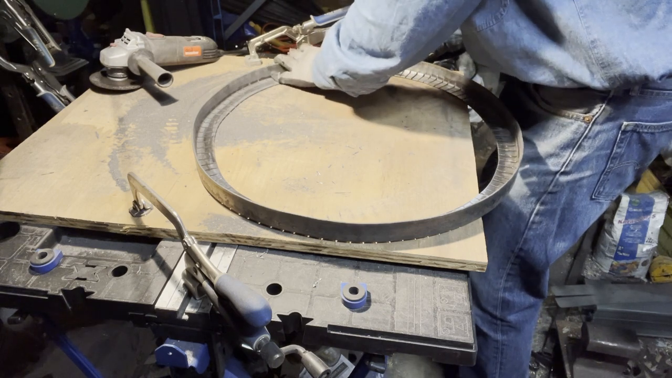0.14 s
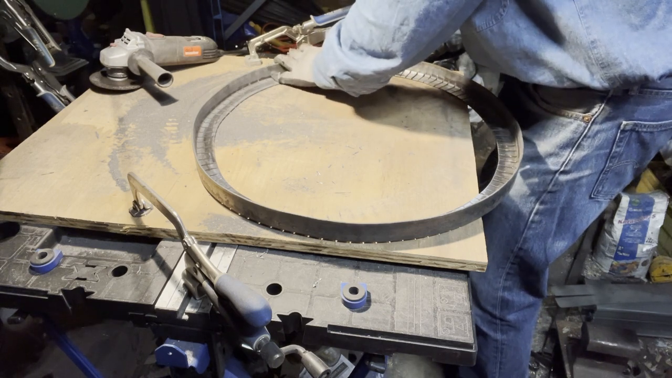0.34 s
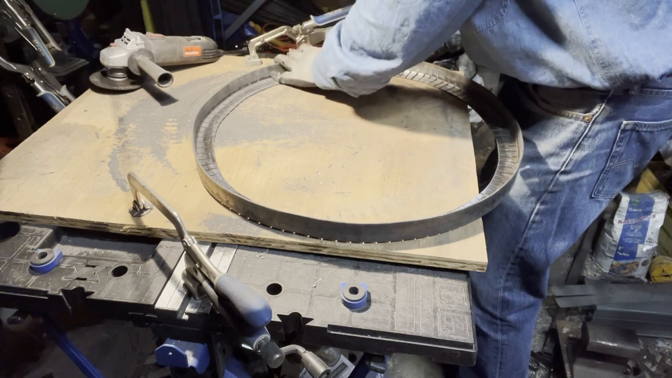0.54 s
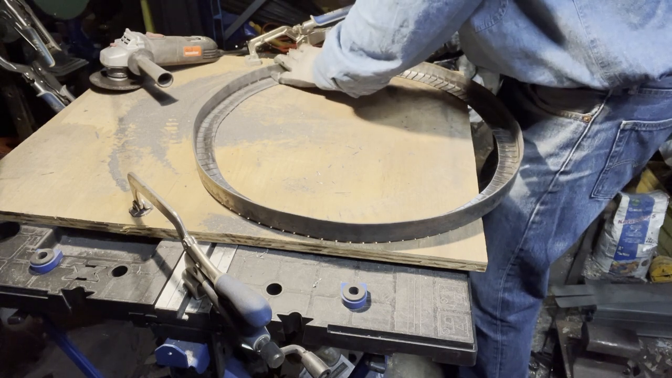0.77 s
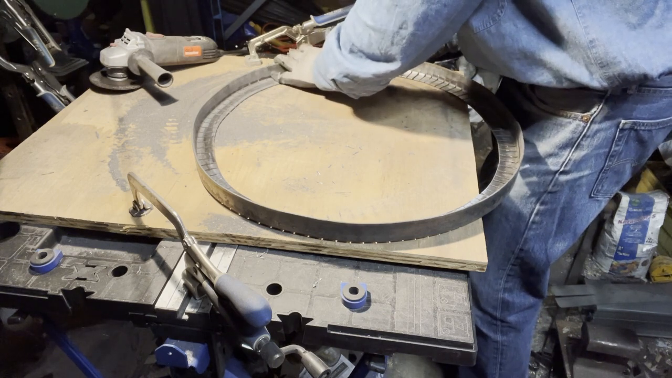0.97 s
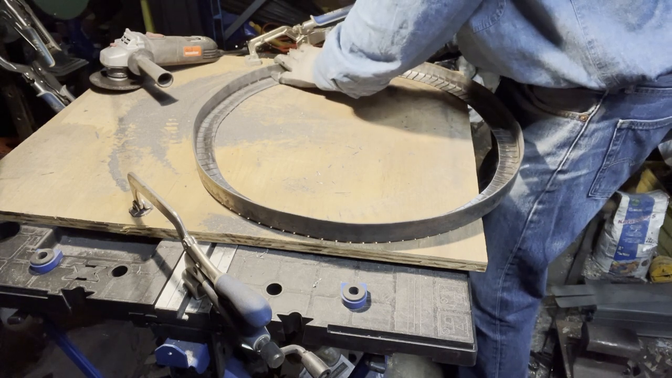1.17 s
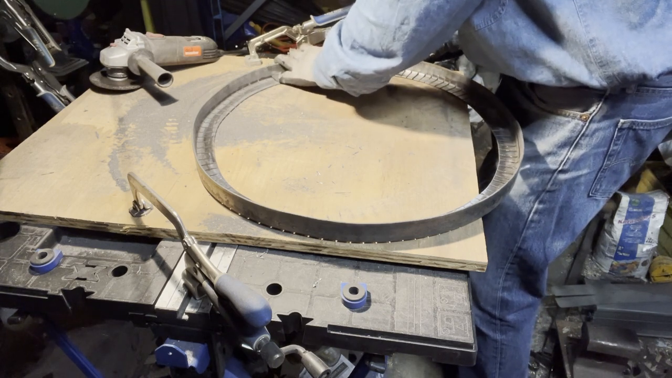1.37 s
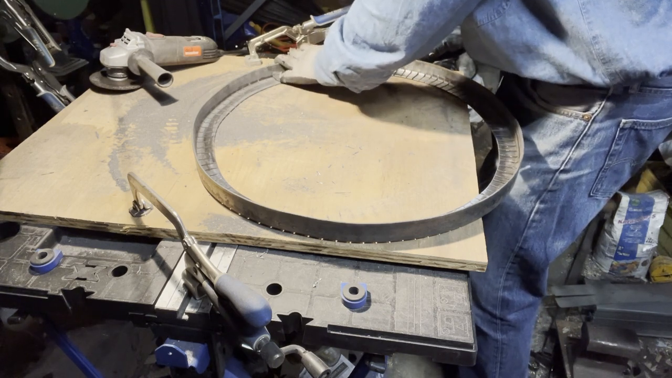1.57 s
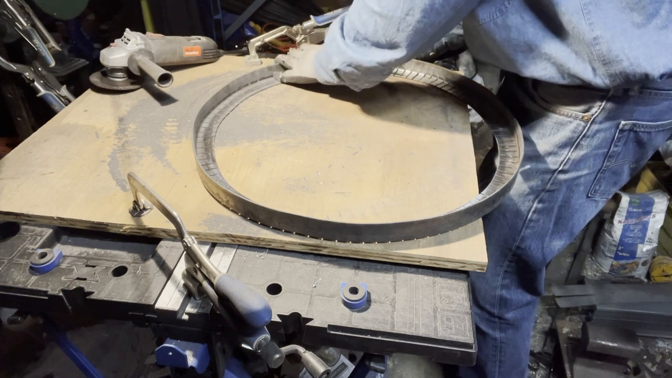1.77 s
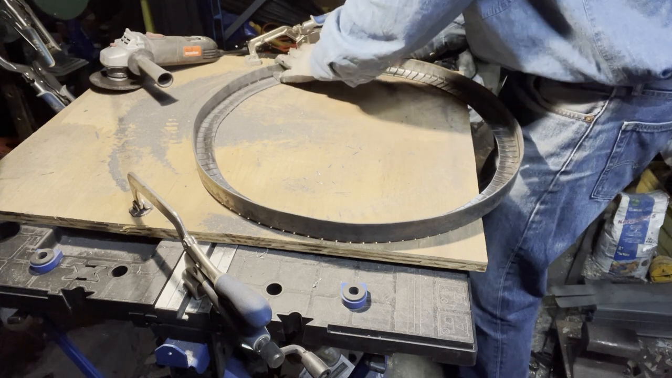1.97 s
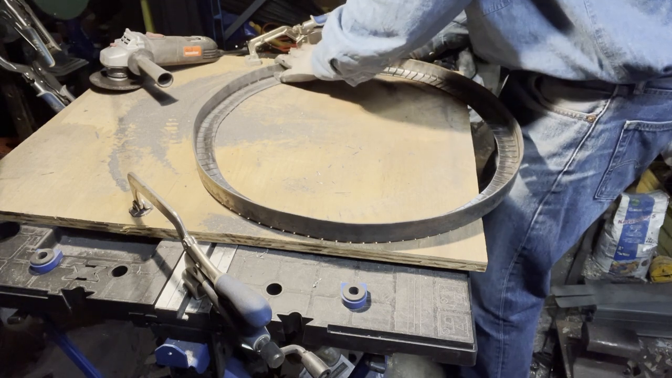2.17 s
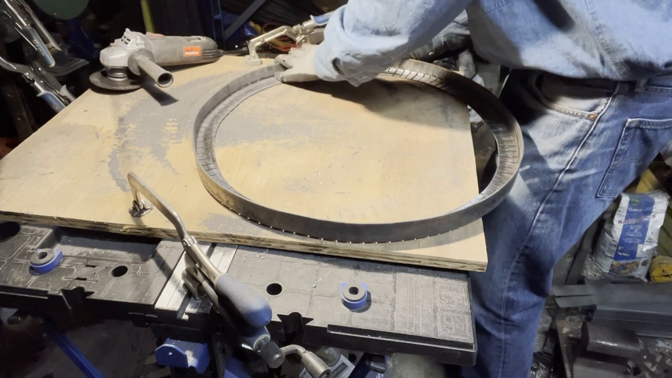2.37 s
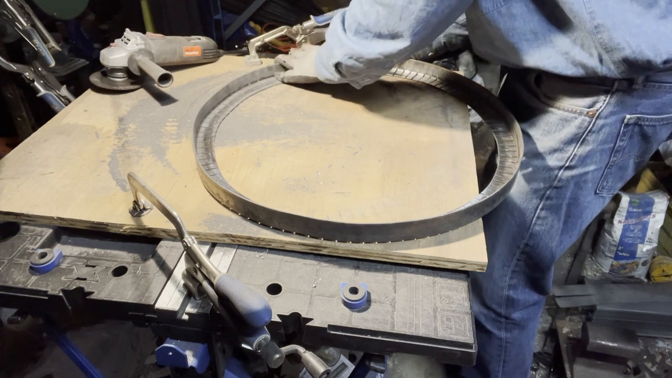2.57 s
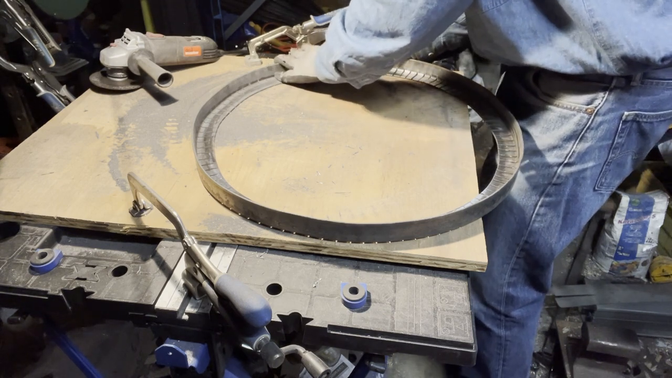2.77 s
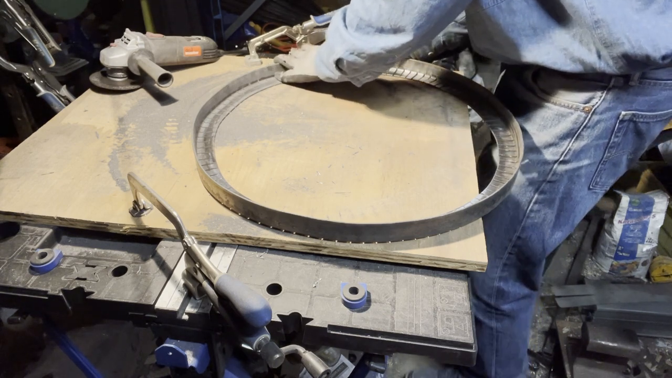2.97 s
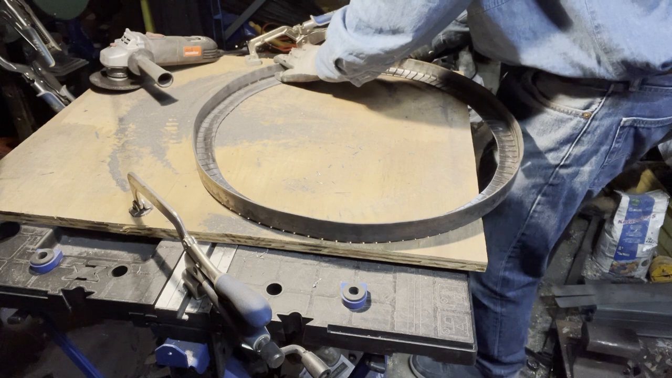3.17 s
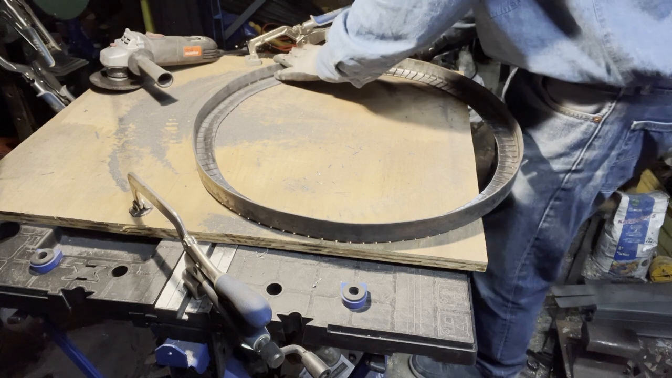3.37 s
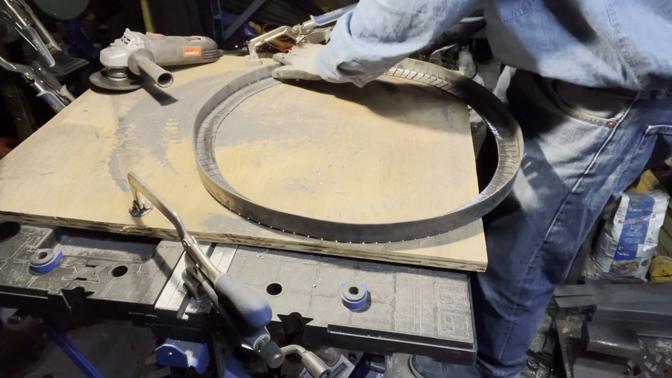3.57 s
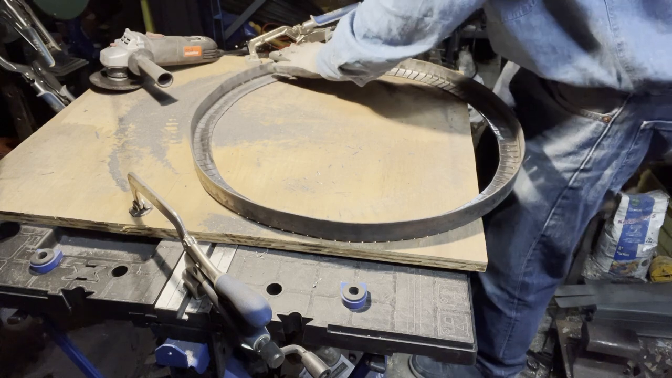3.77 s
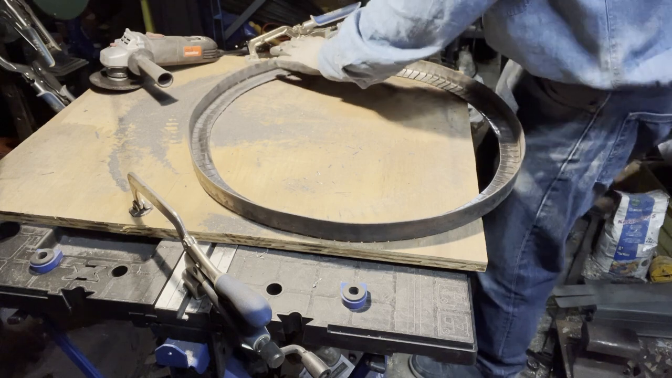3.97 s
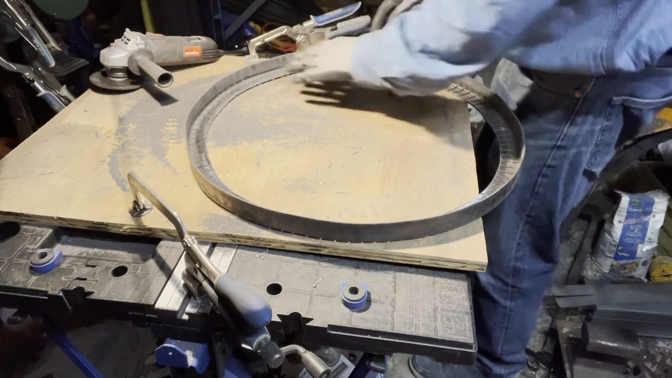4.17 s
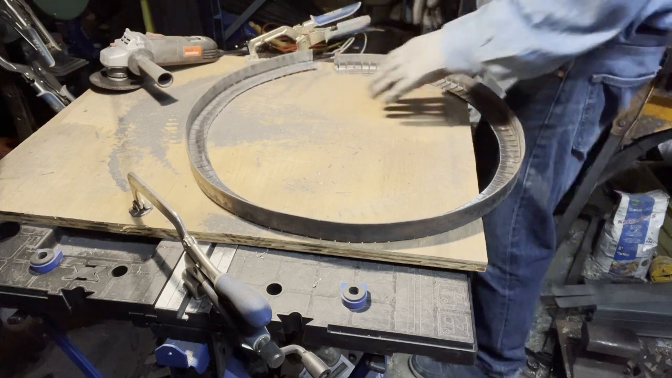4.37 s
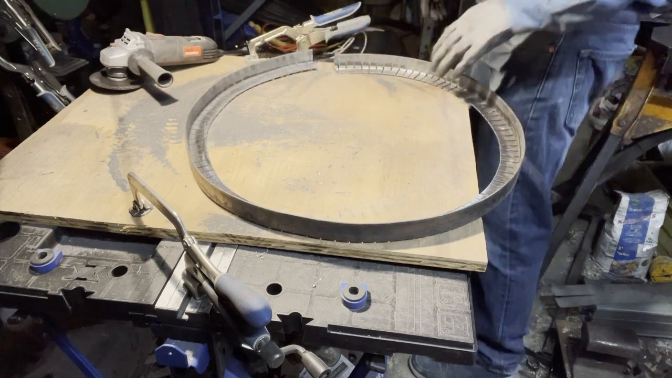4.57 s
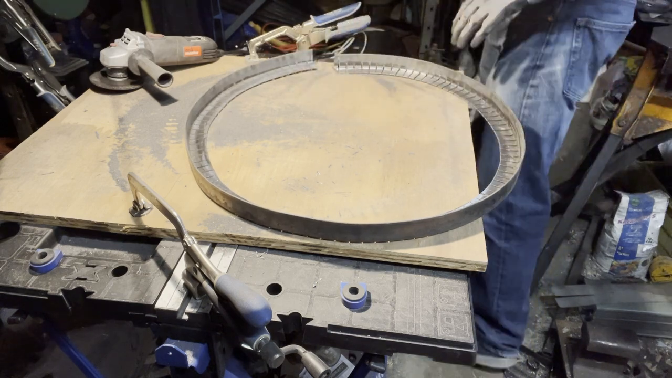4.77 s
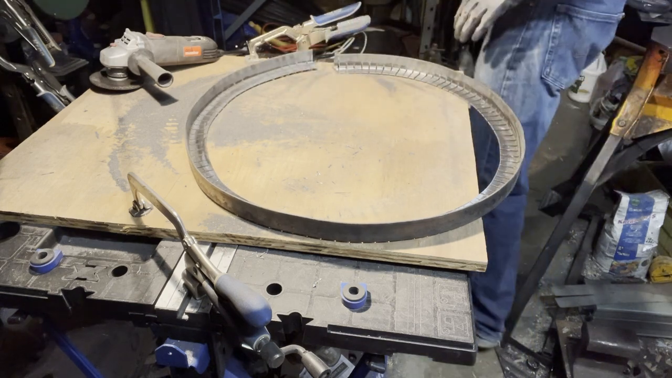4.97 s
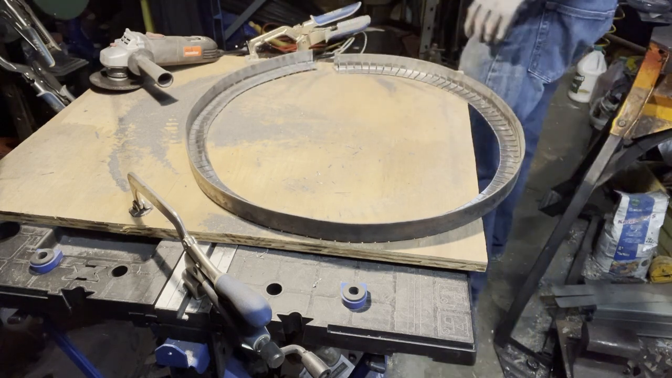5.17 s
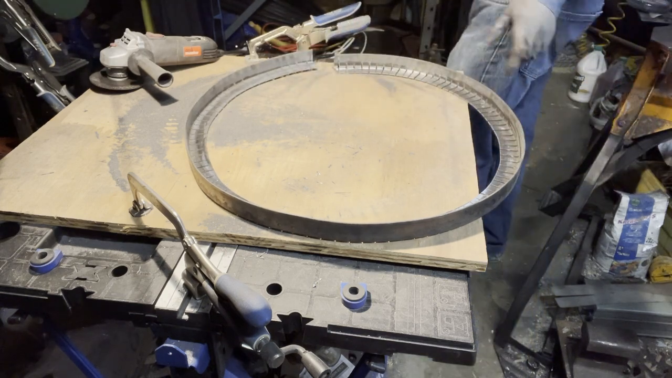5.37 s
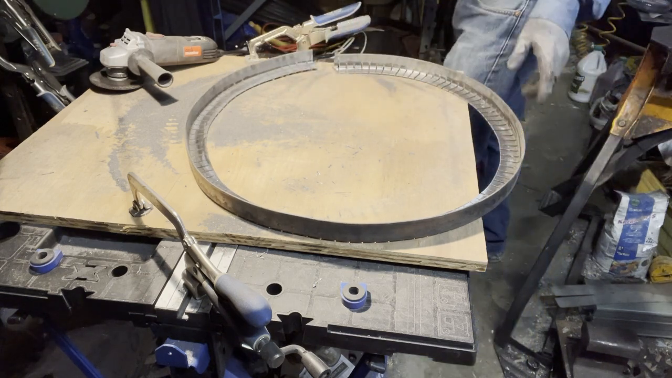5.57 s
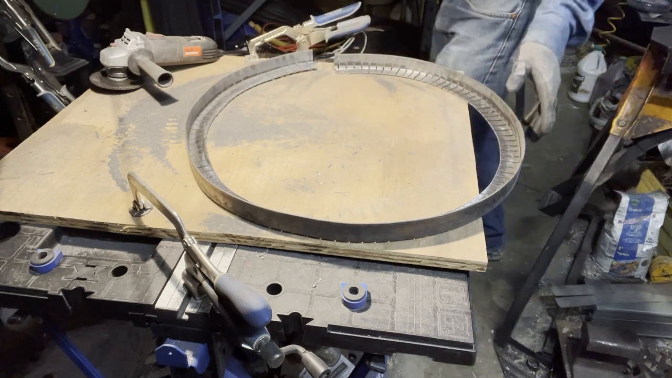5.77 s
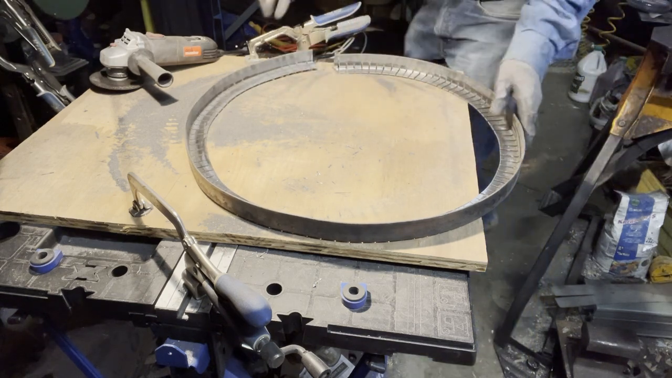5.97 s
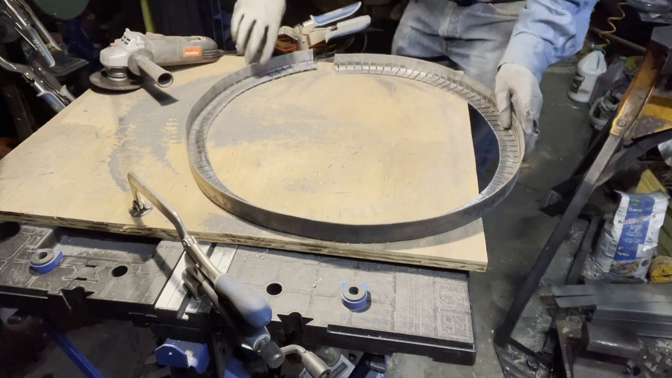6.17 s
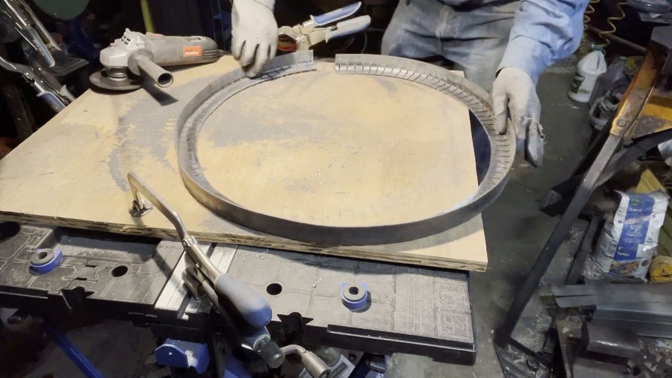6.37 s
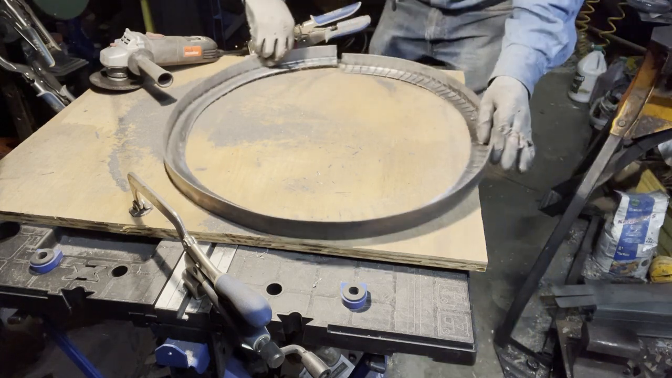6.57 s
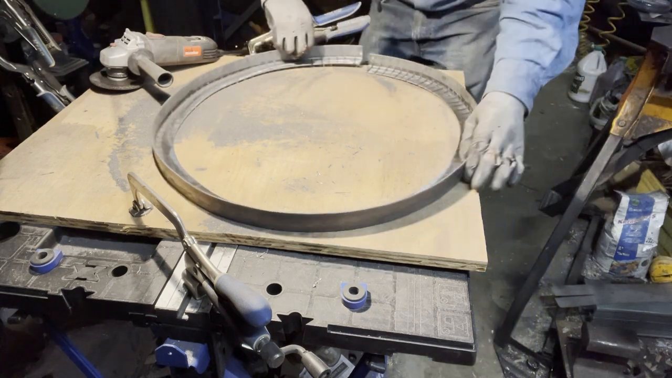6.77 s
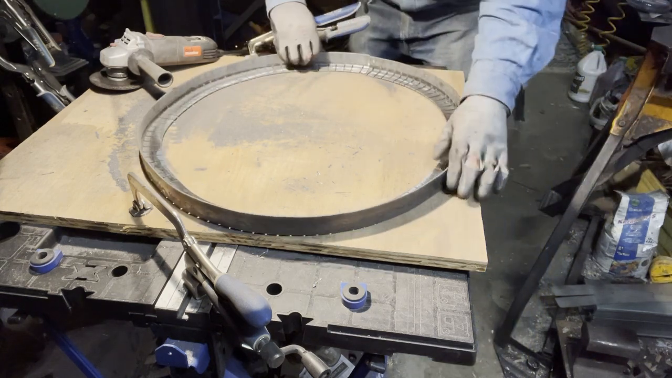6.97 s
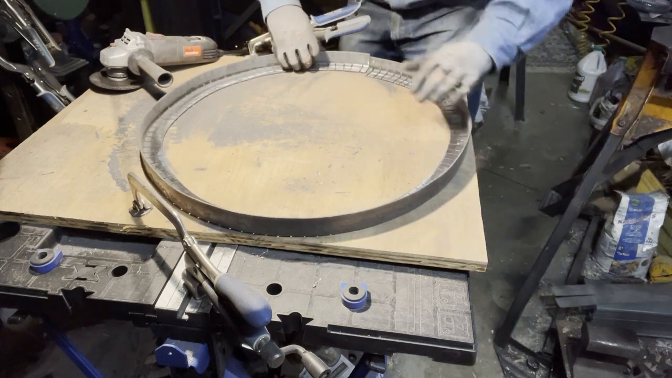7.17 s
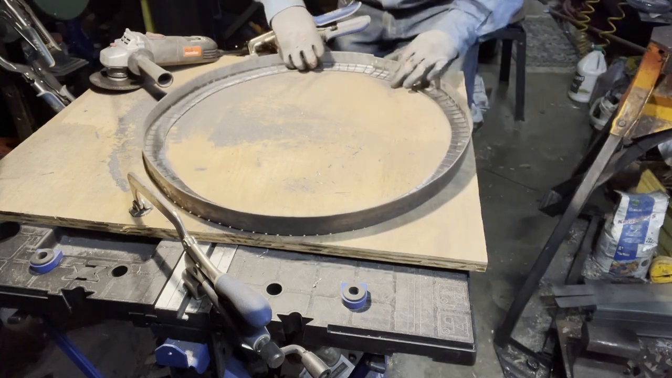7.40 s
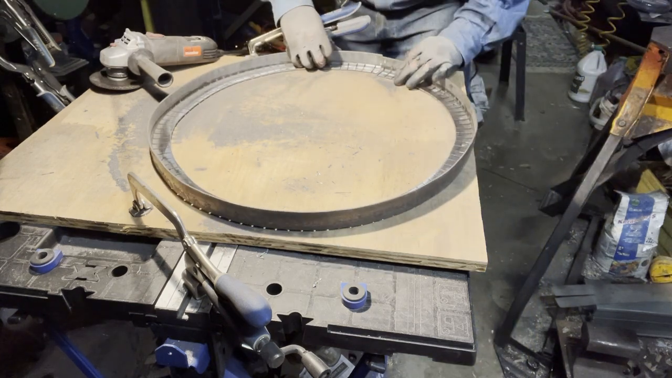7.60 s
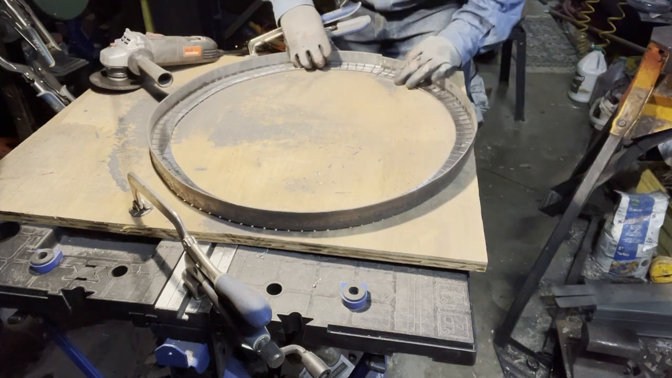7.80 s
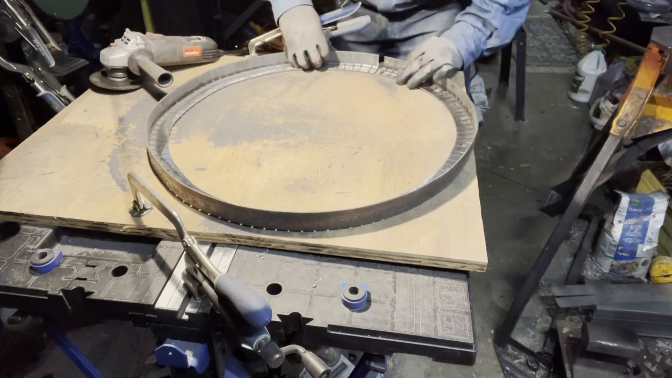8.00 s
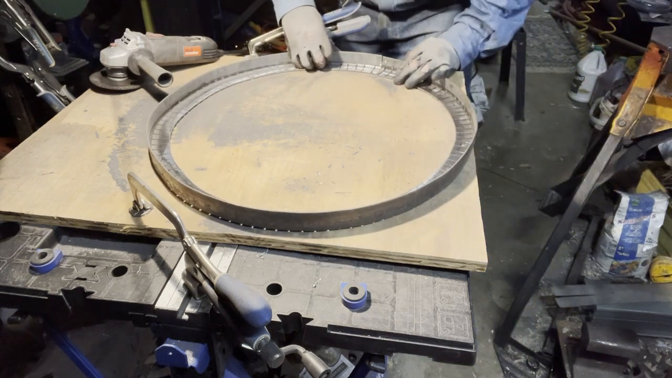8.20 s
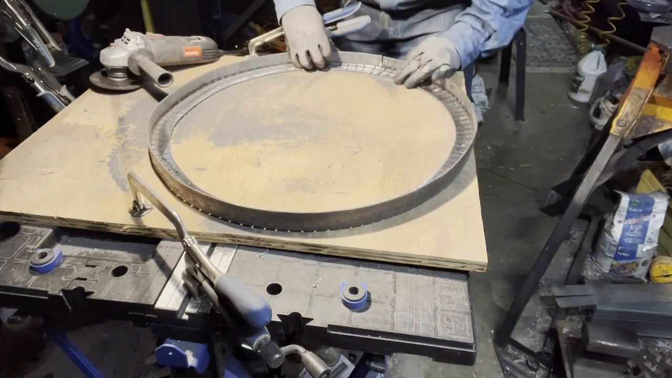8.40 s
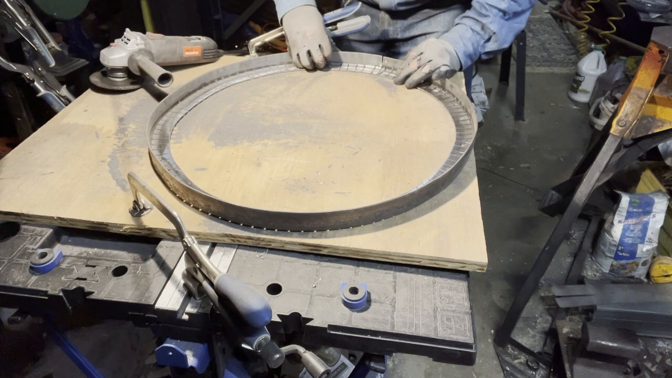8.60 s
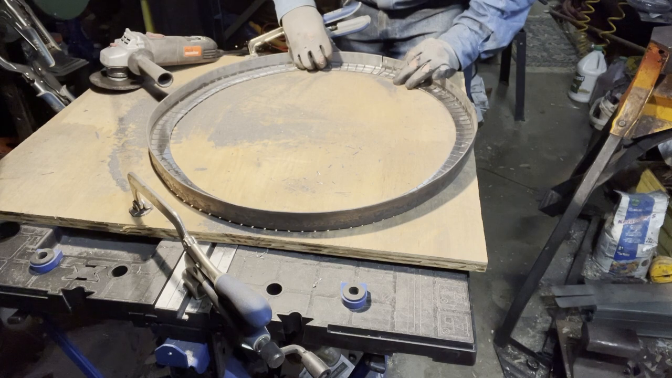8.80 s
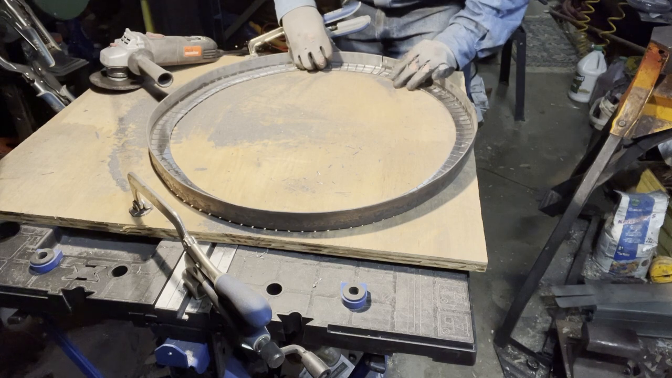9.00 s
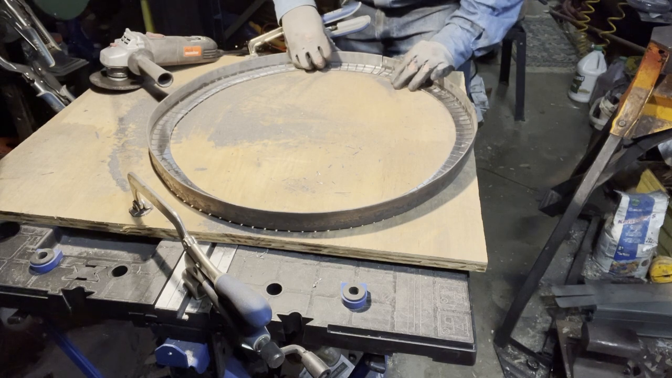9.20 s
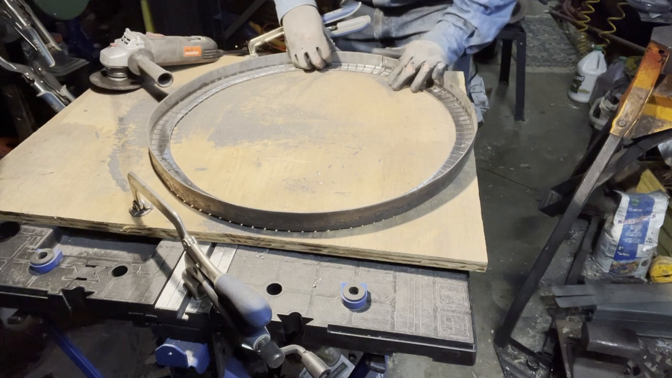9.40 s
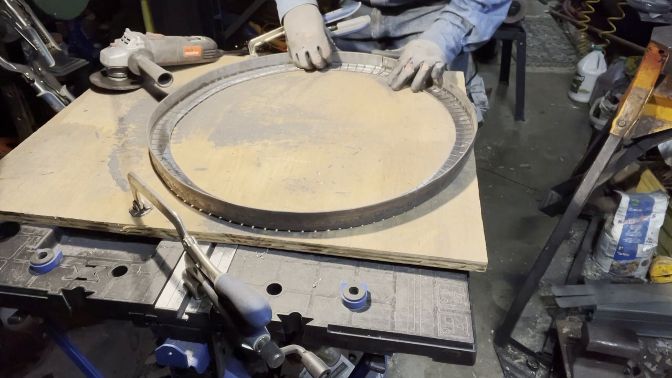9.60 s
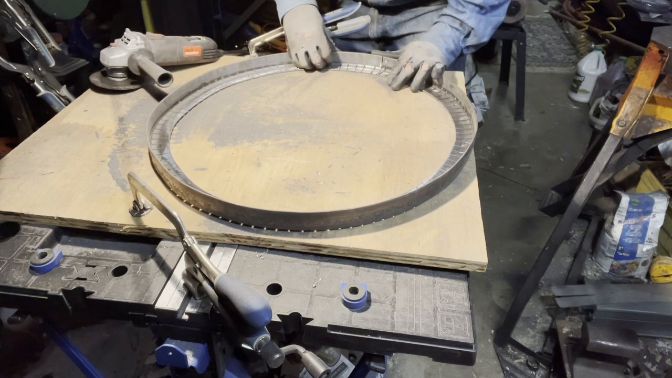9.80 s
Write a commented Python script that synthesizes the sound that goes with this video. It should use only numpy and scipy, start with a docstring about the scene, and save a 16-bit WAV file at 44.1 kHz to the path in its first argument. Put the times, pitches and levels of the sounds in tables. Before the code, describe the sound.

Gloved hands faintly brush a steel band, then drag it raspingly over a drumming plywood bench top, with clattering shoves and fading ticks over low hum.

```python
"""Steel band pushed over a workshop bench

A bent steel band goes across a plywood bench top in a workshop, in one long drag and a few short shoves, in stereo.
Its edge catches and slips on the grain: random slips drive decaying modes and noise, so the board drums,
the band rasps while gripped, rings and briefly squeals, and grit hisses.
Between shoves gloves and work clothes brush in bursts of noise, and the band ticks on the wood over a low machine hum."""
import sys
import numpy as np
from scipy import signal
from scipy.fft import rfft, irfft
from scipy.io import wavfile

SR = 44100
rng = np.random.default_rng(int(sys.argv[2]) if len(sys.argv) > 2 else 0)


def transcribe(signal):
    """Save signal, clipped to [-1, 1], as a 16-bit WAV file at the path in sys.argv[1]."""
    frames = np.atleast_2d(signal).T
    limited = np.clip(frames, -1, 1)
    pcm = np.round(limited * 32767).astype(np.int16)
    wavfile.write(sys.argv[1], SR, pcm)


N = 434385
T = np.arange(N) / SR
RING_T = T[:SR // 2]
EARS = np.array([[1], [-1]])  # left, right


def undb(db):
    """Decibels to gain."""
    return 10 ** (np.asarray(db) / 20)


def unit(x):
    """Scale to an rms of one."""
    return x / np.sqrt(np.mean(x ** 2))


def unit_energy(h):
    """Scale a stereo response so that its middle passes white noise at unchanged level."""
    return h / np.sqrt(np.sum(h.mean(axis=0) ** 2))


def at_hz(hz, table, axis=1):
    """Read one column of a table on a log-frequency axis."""
    table = np.array(table)
    return np.interp(np.log(np.maximum(hz, 1)), np.log(table[:, 0]), table[:, axis])


def lowpass(x, hz):
    """Fourth-order roll-off of the treble."""
    return signal.sosfilt(signal.butter(4, hz, fs=SR, output="sos"), x)


def highpass(x, hz):
    """Third-order roll-off of the bass."""
    return signal.sosfilt(signal.butter(3, hz, "high", fs=SR, output="sos"), x)


def split(x, hz):
    """Part a signal into lows and highs; filtering both ways keeps them in time."""
    low = lowpass(lowpass(x, hz)[..., ::-1], hz)[..., ::-1]
    return low, x - low


def walk(rate, count=N):
    """Smooth chance with an rms of one, turning at most rate times a second."""
    points = rng.standard_normal(N // 20)
    return unit(np.interp(T[:count] * rate, np.arange(N // 20), points))


# stereo image at the microphone: (pitch_hz, side_minus_mid_db, left_minus_right_db)
IMAGE = [(60, -9.5, 2.5), (200, -16.5, 5), (400, -2, -1), (750, -3, -0.5), (2300, -5, 0.5), (4600, 1, 0.5),
         (9000, -7.5, -1), (17000, 11.5, 1)]


def stereo_noise(colour, count, lag_s=.0001):
    """Coloured noise whose side share and left-right balance vary with pitch; its middle has a spread of one."""
    hz = np.arange(count // 2 + 1) * SR / count
    mid, side = rfft(rng.standard_normal((2, count)))
    pair = mid + EARS * side * undb(at_hz(hz, IMAGE))
    pair = pair * undb(EARS * at_hz(hz, IMAGE, axis=2) / 2)
    # the sound reaches the right port slightly sooner
    pair = pair * np.exp(-1j * np.pi * EARS * hz * lag_s)
    x = irfft(pair * undb(at_hz(hz, colour)), count)
    return x / x.mean(axis=0).std()


def fade(t60):
    """Exponential decay by 60 dB in t60 seconds."""
    return np.exp(-np.log(1000) * RING_T / t60)


def modes(table):
    """Decaying sines; each reaches the two ears with its own phase."""
    h = 0
    for k, (hz, db, t60) in enumerate(table):
        spread = (-1) ** k * np.arctan(undb(at_hz(hz, IMAGE)))
        gain = undb(db + EARS * at_hz(hz, IMAGE, axis=2) / 2)
        phase = 2 * np.pi * (hz * RING_T + rng.random()) + EARS * spread
        h = h + gain * fade(t60) * np.sin(phase)
    return unit_energy(h)


def wash(colour, t60, direct_db, room_db, direct_t60=0.012, room_t60=0.41):
    """A direct crack, the crowd of weaker modes behind it, and the short tail of the room."""
    envelope = undb(direct_db) * fade(direct_t60) + fade(t60) + undb(room_db) * fade(room_t60)
    return unit_energy(stereo_noise(colour, len(RING_T)) * envelope)


def sound(force, response):
    """Drive a body with a force."""
    return signal.oaconvolve(force[None], response, axes=1)[:, :N]


def sliding(force, responses, rate):
    """The contact point wanders along the edge, so the same modes answer with changing strength."""
    place, count = walk(rate), len(responses)
    out = 0
    for k, response in enumerate(responses):
        out = out + sound(force * np.cos(place + np.pi * k / count), response)
    return out * np.sqrt(2 / count)


def slips(rate, spread_db):
    """Friction: tiny slips at random moments and of random strength and sign, rate per second."""
    chance, size, sign = rng.random(N), rng.standard_normal(N), rng.choice([-1, 1], N)
    return unit((chance < rate / SR) * sign * undb(spread_db * np.clip(size, -2, 2)))


def snags(rate, release_s):
    """Gain of random catches that let go at once and die away."""
    keep = np.exp(-1 / (SR * release_s))
    power = slips(rate, spread_db=3.0) ** 2 + 1e-18
    return np.sqrt(signal.lfilter([1 - keep], [1, -keep], power))


def swell(t, rise, hold, release, curve=0.71):
    """A movement gathers speed as a power of time, keeps it and dies away."""
    return np.clip(t / rise, 0, 1) ** curve * np.exp(-np.maximum(t - rise - hold, 0) / release)


def strokes(table, axis):
    """Gain of a series of cloth strokes, from one dB column; the fabric rustles on faintly as it settles."""
    gain = np.zeros(N)
    for row in table:
        start, rise = int(row[0] * SR), 0.5 * row[1]
        hold = row[1] - rise
        stroke = swell(RING_T, rise, hold, release=0.02)
        settling = undb(-12.5) * swell(RING_T, rise, hold, release=0.04)
        shape = np.maximum(stroke, settling)
        gain[start:start + len(shape)] += undb(row[axis]) * shape[:N - start]
    return gain


# colour of the room's rumble: (pitch_hz, level_db)
SHOP = [(12, -39.5), (20, -32), (48, 0.5), (68, 0), (91, -6), (123, -3), (150, -16.5), (204, -21.5),
        (285, -24.5), (328, -29), (780, -45.5), (1090, -44.5), (5530, -53.5), (9140, -52), (16000, -72)]
# machine hum, mean levels before panning: (pitch_hz, level_db)
HUM = [(59.2, -69.5), (118.8, -57), (178, -77)]


def workshop(shop_db=-54.5, pan_db=3.0):
    """A machine hum of sines wavering in level and phase, over the noise rumble of the room."""
    hum = 0
    for hz, db in HUM:
        level = np.sqrt(2) * undb(db + 0.97 * walk(rate=13.0))
        hum = hum + level * np.sin(2 * np.pi * hz * T + 0.3 * walk(rate=4.8))
    return hum * undb(EARS * pan_db / 2) + undb(shop_db) * stereo_noise(SHOP, N)


# Stroke levels here are before each layer's own gain.
# gloves brushing the band: (start_s, length_s, scuff_level_db, hiss_level_db)
BRUSHES = [(.24, 0.12, -74, -102), (.365, 0.0051, -61.5, -68), (.63, 0.041, -58, -74),
           (.745, 0.13, -68, -98), (.865, 0.055, -51, -64.5), (.95, 0.087, -94, -103),
           (1.02, 0.074, -74, -91), (1.255, 0.055, -70.5, -95), (1.46, 0.11, -70, -95),
           (1.58, 0.075, -63.5, -77), (1.895, 0.026, -66, -84), (2.12, 0.074, -67, -81),
           (2.172, 0.071, -48, -63.5), (2.312, 0.006, -57, -61), (2.34, 0.07, -80, -70),
           (2.44, 0.12, -66.5, -78), (2.556, 0.031, -55, -54), (2.63, 0.11, -72, -81),
           (2.9, 0.082, -73, -53.5), (2.97, 0.044, -48.5, -52.5), (3.108, 0.082, -51, -51),
           (3.22, 0.16, -73, -69.5), (3.375, 0.14, -59, -65), (3.57, 0.24, -59.5, -75),
           (8.372, 0.026, -50, -64.5), (8.43, 0.064, -51.5, -74), (8.53, 0.21, -61.5, -74),
           (8.68, 0.2, -74, -71.5), (8.9, 0.15, -55.5, -61.5), (9.04, 0.12, -64, -61.5),
           (9.17, 0.16, -63, -66.5), (9.35, .15, -55.5, -61), (9.53, .2, -63, -70),
           (9.742, 0.073, -63, -77)]
# work clothes rubbing during a few steps round the bench: (start_s, length_s, swish_level_db, hiss_level_db)
DENIM = [(4.16, 0.056, -58.5, -76), (4.24, 0.37, -67.5, -73), (4.46, 0.05, -58, -68), (4.5, 0.16, -72, -75),
         (4.59, 0.079, -60, -61), (4.65, 0.13, -60.5, -66.5), (4.688, 0.0073, -79, -50.5),
         (4.77, 0.21, -70.5, -77.5), (4.97, 0.15, -79, -92), (5.195, 0.0091, -96, -78),
         (5.3, 0.016, -98, -77.5), (5.54, 0.018, -89, -76.5), (5.615, 0.073, -57.5, -61.5),
         (5.69, 0.15, -76, -77.5), (5.775, 0.071, -63.5, -70), (5.865, 0.081, -58.5, -56),
         (5.93, 0.12, -54.5, -59), (6.08, 0.14, -78, -77)]
# colours of the fibres' hiss and of the clothes' swish: (pitch_hz, level_db)
CLOTH = [(300, -50), (1500, 0), (3800, -1), (6000, -0.5), (9000, 3.5), (11500, -9), (16000, -13)]
SWISH = [(100, 16.5), (350, -8), (600, -9.5), (900, 5.5), (1500, -3), (3000, 2), (5000, -1.5), (10000, -54)]


def cloth(glove_db=-1, split_hz=5500):
    """Glove and denim fibres flick past each other in uneven patches, now duller, now brighter."""
    patches = unit(undb(1.4 * walk(rate=70) + 0.29 * walk(rate=830)))
    # now and then a thread snags and lets go
    flicker = unit(patches * (1 + 0.15 * snags(rate=64, release_s=0.001)))
    dull, bright = split(stereo_noise(CLOTH, N), split_hz)
    tilt = undb(0.8 * walk(rate=36))
    hiss_gain = undb(glove_db) * strokes(BRUSHES, axis=3) + strokes(DENIM, axis=3)
    hiss = hiss_gain * (dull / tilt + bright * tilt)
    swish = strokes(DENIM, axis=2) * stereo_noise(SWISH, N)
    return flicker * (hiss + swish)


def fingers():
    """The gloves grip, snag and let go in patches as they brush the steel."""
    grip = undb(0.74 * walk(rate=33)) * (1 + 0.19 * snags(rate=84, release_s=0.0007))
    return unit(grip) * strokes(BRUSHES, axis=2)


# the band knocking on the board, levels before each body's own gain, pitch the centre of the push on the band:
# (start_s, band_level_db, board_level_db, contact_level_db, pitch_hz)
KNOCKS = [(0.655, -61, -59, -70, 1000), (1.92, -56, -70, -63, 1990), (2.184, -51, -66, -53, 2400),
          (2.246, -63, -44, -45.5, 1200), (2.317, -43.5, -66, -49, 1990), (2.39, -74, -75, -63, 2060),
          (2.404, -61.5, -73, -53, 2800), (2.482, -68, -76, -59, 3000), (2.574, -37.5, -63, -54, 1400),
          (2.579, -44.5, -40.5, -61, 900), (3.01, -38, -46, -44, 1740), (3.201, -51, -46, -59, 1600),
          (3.388, -73, -72, -46.5, 1500), (3.575, -53.5, -58, -64, 2000), (3.73, -46, -34, -66, 1200),
          (3.755, -48, -31, -60, 1000), (3.794, -44, -42, -58, 1400), (3.823, -40, -35.5, -58, 1300),
          (3.848, -53, -33, -60, 1000), (4.113, -43.5, -33.5, -54.5, 900), (4.146, -65, -38, -73, 800),
          (4.164, -35.5, -26, -56, 890), (4.177, -44, -20, -55, 1000), (4.438, -60, -55, -53.5, 900),
          (4.467, -47.5, -47.5, -54, 1307), (4.6, -47.5, -47, -50, 1300), (4.698, -69, -65, -43, 3500),
          (5.075, -63, -60, -81, 1690), (5.628, -67, -49, -58, 900), (6.42, -45, -40, -49, 940),
          (6.552, -30, -35, -49, 1890), (6.589, -23.5, -52, -44, 950), (6.684, -24.5, -30, -41, 900),
          (6.694, -27, -16.5, -39, 902), (6.763, -20.5, -32, -45, 830), (6.784, -17.5, -20.5, -46, 800),
          (6.837, -27, -24, -42, 1100), (6.844, -29, -18, -46, 1000), (6.977, -31, -20.5, -55, 910),
          (6.991, -27, -48, -22, 2630), (7.064, -35.5, -48, -30.5, 2570), (7.08, -29.5, -26, -37, 1600),
          (7.213, -64, -55, -45.5, 1000), (7.245, -63, -69, -45, 3000), (7.356, -33.5, -34.5, -38.5, 1380),
          (7.513, -24, -34, -37, 1400), (7.537, -27, -17.5, -50, 1000), (7.549, -34, -18.5, -48, 850),
          (7.561, -32, -24.5, -46, 1000), (7.577, -32, -26, -44, 920), (7.773, -39.5, -32, -57, 1400),
          (7.883, -35.5, -48, -35, 2600), (7.962, -47, -31, -51, 900), (8.072, -35.5, -64, -43, 1700),
          (8.137, -35, -23.5, -61, 1000), (8.146, -18.5, -21, -46, 1300), (8.382, -54.5, -41, -73, 1400),
          (8.464, -45.5, -44.5, -50, 1900), (8.62, -47.5, -44, -56, 1520), (8.697, -53, -59, -54, 2410),
          (8.855, -59.5, -72, -57, 3000), (8.909, -51, -73, -53.5, 2600), (9.007, -47, -53, -49.5, 2400),
          (9.125, -49, -46, -52, 1000), (9.196, -77, -65, -56, 2400), (9.253, -41.5, -57, -49, 3000),
          (9.28, -38, -44, -52, 1750), (9.352, -52, -72, -59, 2380), (9.57, -42.5, -54, -51, 2130),
          (9.788, -38.5, -46, -58, 2200), (9.797, -38.5, -45, -54.5, 1450)]


def blows(axis, tinted=False, chatter=0.54, chatter_s=0.0042, spread=2.06):
    """A push for every knock, then brief chatter; tinted pushes favour the modes around their own pitch."""
    force, t = np.zeros(N), T[:SR // 50]
    for row in KNOCKS:
        push = chatter * rng.standard_normal(len(t)) * np.exp(-t / chatter_s)
        push[0] = 1
        push = push / np.linalg.norm(push)
        if tinted:
            edges_hz = row[4] * spread ** np.array([-1, 1])
            push = signal.lfilter(*signal.butter(2, edges_hz, "band", fs=SR), push)
        start = int(row[0] * SR)
        force[start:start + len(t)] += undb(row[axis]) * push[:N - start]
    return force


# the hands press the band, let go, grip it for the drag and lay it flat: (start_s, free_share of the ring)
FREE = [(0, 0.44), (2.4, .4), (3.5, 0.57), (3.75, 0.33), (3.95, 0.49), (4.17, 0.68), (5.9, .77),
        (6.25, 0.49), (6.68, 0.31), (6.84, 0.68), (7.5, 0.74)]


def ring_free():
    """Share of the ring that the hands leave free, over time."""
    return np.interp(T, *np.transpose(FREE))


# colour of the hand-damped band: (pitch_hz, level_db)
SCUFF = [(150, -12.5), (350, 13.5), (600, -5.5), (850, 11), (1300, 0.5), (1800, 6), (2700, 1), (3500, -2.5),
         (4800, -41), (7000, -39), (12000, -22)]


def scuffs(rubs, scuff_db=-2, knock_db=22):
    """Under a hand the band is damped: dry ticks and grainy scuffs whose colour shifts with the fingers."""
    spots = [wash(SCUFF, t60=0.12, direct_db=-7.5, room_db=-40.5) for _ in range(2)]
    held = 1 - 1.03 * ring_free()
    rubbing = undb(scuff_db) * slips(rate=500, spread_db=4.5) * rubs
    ticks = undb(knock_db) * blows(axis=1, tinted=True)
    return sliding(held * (rubbing + ticks), spots, rate=26)


# Effort levels are before each layer's own gain; weight and grit are offsets in dB, weight scaled by the layer.
# the long drag across the board: (start_s, effort_db, weight_db, grit_db)
DRAG = [(6.218, -61.5, -9, -10), (6.264, -50.5, -12, -18), (6.36, -41.5, 5.5, -15), (6.43, -35.5, 7.5, -16),
        (6.516, -39.5, 3.5, -14.5), (6.598, -31, -10, -16), (6.69, -30, 9, -9), (6.75, -31.5, 0, -11),
        (6.812, -32.5, 11.5, -10), (6.845, -32, 11, -10), (6.89, -35.5, -6, -14), (6.967, -36, 6, -9.5),
        (6.983, -37, 19.5, -11), (6.999, -39, 0.5, -0.5), (7.204, -56, -12.5, -10), (7.343, -55, -4, -2.5)]
# short shoves: (start_s, rise_s, hold_s, release_s, effort_db, weight_db, grit_db)
SHOVES = [(3.708, 0.067, 0.037, 0.035, -40, 5, -13.5), (3.853, 0.044, 0.045, 0.074, -53, 7.5, -12),
          (4.055, 0.093, 0.072, 0.045, -58, 15.5, -15), (7.351, 0.013, 0.084, 0.015, -54.5, 7.5, -3),
          (7.443, 0.067, 0.067, 0.011, -30, 8.5, -12.5), (7.715, 0.024, 0.019, 0.069, -56, -4, -12),
          (7.865, 0.044, 0.081, 0.025, -38.5, 5, -13.5), (8.053, 0.084, 0.017, 0.0054, -31.5, 4.5, -13.5),
          (9.082, 0.018, 0.043, 0.012, -52, -2, -18), (9.736, 0.009, 0.087, 0.038, -59.5, 6.5, -12)]


def effort(weight_share=0, gritty=False):
    """How hard the edge scrapes, as one layer feels it: the long drag and the short shoves."""
    def felt(db, weight, grit_db):
        """Level in dB with the layer's share of the weight, and the grit if it hears it."""
        return db + weight_share * weight + (grit_db if gritty else 0)

    s, *controls = np.transpose(DRAG)
    gain = undb(np.interp(T, s, felt(*controls), left=-np.inf, right=-np.inf))
    for start, rise, hold, release, *controls in SHOVES:
        gain = gain + undb(felt(*controls)) * swell(T - start, rise, hold, release, curve=1.14)
    return gain


# steel band modes: (pitch_hz, level_db, t60_s)
BAND = [(765, -4, .13), (789, -3, .11), (812, 0, .14), (866, -5, .11), (937, -5, .13), (1022, -8, .11),
        (1060, -6, .12), (1125, -11, .16), (1170, -12, .24), (1352, -9, .19), (1440, -14, .14),
        (1545, -12, .2), (1691, -7.5, .17), (1884, -16, .22), (2131, -11, .18), (2171, -5, .23),
        (2229, -13, .27), (2285, -15, .26), (2380, -14, .2), (2480, -12, .17), (2557, -14.5, .25),
        (2660, -14, .18), (2806, -19, .33), (2860, -20, .3), (2925, -19.5, .33), (3075, -18, .17),
        (3195, -16, .17), (3733, -20, .17), (3922, -20.5, .31), (4102, -20, .27), (4645, -20, .15)]
# colour of the band's weaker modes: (pitch_hz, level_db)
BAND_WASH = [(300, -14), (690, -15), (790, 6.5), (1050, 0), (1380, -2), (1700, 0), (1980, 1), (2190, 9.5),
             (2700, -4), (3500, -12.5), (5000, -14.5), (9000, -65)]


def band(judder, rubs, knock_db=24, low_db=1.0, high_db=2, brush_db=-4, split_hz=1450):
    """The steel rings from scraping, from the gloves and from each knock."""
    spots = []
    for _ in range(3):
        ring = modes(BAND) + wash(BAND_WASH, t60=0.085, direct_db=5.0, room_db=-21.5)
        spots.append(unit_energy(lowpass(ring, hz=5240)))
    # a heavy drag feeds the low modes, a light skid the high ones
    low, high = split(slips(rate=1800, spread_db=4.0) * judder, split_hz)
    scrape = undb(low_db) * low * effort(weight_share=0.25)
    scrape = scrape + undb(high_db) * high * effort(weight_share=-0.094)
    # the gloves barely reach the low modes: the difference thins the bass
    brush = slips(rate=1200, spread_db=-9.5) * rubs
    brush = undb(brush_db) * np.diff(brush, prepend=0) * SR / (2 * np.pi * split_hz)
    free = ring_free()
    knocks = undb(knock_db) * free * blows(axis=1, tinted=True)
    return sliding(free * (scrape + brush), spots, rate=15) + sound(knocks, spots[0])


# the two loose ends of the band clicking together, levels before the push gain: (start_s, level_db)
CLICKS = [(0.645, -61), (.655, -50.5), (.748, -53), (.818, -59.5), (0.914, -63), (1.263, -61), (2.319, -53),
          (2.575, -51), (6.991, -33), (7.066, -50), (7.356, -43.5)]
# what those clicks ring with: (pitch_hz, level_db, t60_s)
ENDS = [(1740, -7.5, .25), (2100, -4, 0.17), (2680, -8, 0.51), (2900, -11, 0.65), (3040, -7, .04),
        (3150, 0, .05), (3480, -12, .08), (4500, 2, 0.088), (5240, -12, 0.2)]
# colour of their crack: (pitch_hz, level_db)
CRACK = [(600, -28), (1500, -4.5), (2200, 11), (2650, -10), (3100, 14), (3800, -24), (4500, 0.5),
         (5400, -16), (6500, -23), (14000, -20)]


def impulses(table, push_db):
    """One single-sample push for each (start_s, level_db) row."""
    force = np.zeros(N)
    for s, db in table:
        force[int(s * SR)] = undb(db + push_db)
    return force


def clicks(push_db=20, ring_db=-5):
    """Steel meets steel, each time at a slightly different spot: a sharp crack, then a thin ring that lingers."""
    spots = []
    for _ in range(3):
        crack = wash(CRACK, t60=0.07, direct_db=8.5, room_db=-14)
        spots.append(crack + undb(ring_db) * modes(ENDS))
    return sliding(impulses(CLICKS, push_db), spots, rate=13)


# plywood modes: (pitch_hz, level_db, t60_s)
BOARD = [(113, -4, 0.2), (147, -3.5, 0.14), (177, -.5, 0.17), (208, -2.5, 0.12), (247, -8, .1),
         (283, -3, 0.14), (342, -2, 0.14), (378, -2, 0.15), (412, -3.5, 0.11), (455, -5, .1),
         (497, -5.5, 0.14), (570, -11, .11), (600, -11, 0.13)]
# colour of the plywood's weaker modes: (pitch_hz, level_db)
BOARD_WASH = [(50, -17), (85, -4), (140, 2.5), (240, -7), (350, -1), (480, -27), (640, -15), (1200, -32)]


def board(judder, knock_db=21, scrape_db=-1, lowest_hz=85):
    """The plywood drums under the knocks and the coarse catches of the edge."""
    spots = []
    for _ in range(3):
        drum = modes(BOARD) + wash(BOARD_WASH, t60=0.069, direct_db=-14.0, room_db=-23.5)
        drum = unit_energy(lowpass(drum, hz=900))
        # the board's sound thins out below its lowest modes
        spots.append(highpass(drum, lowest_hz))
    scrape = slips(rate=1500, spread_db=1.0) * unit(np.sqrt(judder)) * effort(weight_share=0.7)
    knocks = undb(knock_db) * lowpass(blows(axis=2, chatter=0.074), hz=556)
    return sliding(undb(scrape_db) * scrape, spots, rate=9) + sound(knocks, spots[0])


# colour of the gripped band: (pitch_hz, level_db)
RASP = [(500, -35), (670, -24), (780, 11), (1050, 4), (1220, -4.5), (1400, -0.5), (2000, 5.5), (2600, 0),
        (2950, -15.5), (3250, -6.5), (3450, -5), (3750, -5), (4700, -9), (6000, -27), (10000, -54.5)]


def rasp(judder, scrape_db=0.5, knock_db=21, sway_db=2.0, split_hz=1700):
    """Gripped in the hands, the band's edge grinds in a broad, coarse rasp that sways between dull and bright."""
    spots = [wash(RASP, t60=0.06, direct_db=10, room_db=-17) for _ in range(4)]
    dull, bright = split(slips(rate=420, spread_db=2.5) * judder * effort(), split_hz)
    sway = undb(sway_db * walk(rate=18))
    scrape = undb(scrape_db) * (dull / sway + bright * sway)
    knocks = undb(knock_db) * blows(axis=1, tinted=True)
    held = 1 - ring_free()
    return sliding(held * (scrape + knocks), spots, rate=22)


# colour of the grit: (pitch_hz, level_db)
GRIT = [(1500, -3.5), (3000, 2), (4500, -1), (6000, 3.5), (8500, 5), (11000, -5.5), (16000, -11.5)]
# high overtones of the band: (pitch_hz, level_db, t60_s)
OVERTONES = [(4840, -5, .15), (5081, -1.5, .17), (6060, -5, .12), (6740, -4, .15), (7180, -7, .16),
             (7503, -5, .18), (7798, -1.5, .18), (8560, -3, .16), (9216, -7, .2), (9980, -8, .15),
             (10450, -8, .16)]


def grit(judder, knock_db=19, scrape_db=2.0, overtone_db=-11.0):
    """Dust and wood fibres crackle under the edge and wake its high overtones."""
    spots = []
    for _ in range(2):
        crackle = wash(GRIT, t60=0.16, direct_db=15.5, room_db=-19.0)
        spots.append(unit_energy(crackle + undb(overtone_db) * modes(OVERTONES)))
    scrape = slips(rate=4000, spread_db=2.0) * judder * effort(gritty=True)
    contacts = undb(knock_db) * blows(axis=3)
    return sliding(undb(scrape_db) * scrape, spots, rate=20) + sound(contacts, spots[0])


# squeals of the edge locking onto one mode, and, last, two faint high rings of the struck band:
# (centre_s, length_s, pitch_hz, level_db, blur_share of the pitch)
TONES = [(3.206, 0.0073, 2930, -50, .02), (3.47, 0.058, 3110, -62, 0.055), (6.7, 0.15, 3150, -38.5, .035),
         (6.769, 0.31, 793.4, -34, 0.049), (6.806, 0.012, 822, -20.5, 0.007),
         (6.867, 0.1, 2172, -38, 0.031), (7.505, 0.071, 790, -32.5, 0.031),
         (7.533, 0.065, 2157, -34, 0.039), (7.539, 0.051, 2600, -39.5, 0.039),
         (8.134, 0.053, 800, -61, 0.042), (9.584, 0.037, 9200, -63, 0.0076),
         (9.8, 0.044, 9280, -72, 0.0087)]


def squeals_and_rings(flutter_db=1.5):
    """Slips in step with one mode make it sing, uneven ones blur it to a rasp; two faint rings of the struck band."""
    out, count = np.zeros(N), len(RING_T)
    for s, length, hz, db, blur in TONES:
        start = int(s * SR) - count // 2
        bell = np.exp(-(2 * (RING_T - RING_T.mean()) / length) ** 2)
        envelope = bell * undb(db + flutter_db * walk(rate=150, count=count))
        pitch = hz * (1 + blur * walk(rate=330, count=count))
        tone = np.sqrt(2) * envelope * np.sin(2 * np.pi * np.cumsum(pitch) / SR)
        out[start:start + count] += tone[:N - start]
    return out


# soft nudges against the bench, levels before the push gain: (start_s, level_db)
BUMPS = [(3.209, -51), (3.29, -50.5), (3.386, -49.5), (3.791, -41), (3.87, -36.5), (4.057, -42.5),
         (4.173, -24), (6.436, -39.5), (7.274, -40.5), (8.298, -49), (8.63, -44), (9.127, -60)]


def bumps(push_db=27):
    """A soft, slow push moves only the lowest modes of the bench."""
    return sound(impulses(BUMPS, push_db), lowpass(modes(BOARD[:3]), hz=216))


def scene():
    """One uneven grip of the edge drives board, band, rasp and grit; the gloves rub ringing and damped steel."""
    grip = undb(0.71 * walk(rate=97) + 1.25 * walk(rate=35))
    judder = unit(grip * (1 + 0.23 * snags(rate=71, release_s=0.0014)))
    rubs = fingers()
    hands = cloth() + scuffs(rubs)
    steel = band(judder, rubs) + clicks() + rasp(judder) + squeals_and_rings()
    bench = board(judder) + grit(judder) + bumps()
    return workshop() + hands + steel + bench


def record(dry, top_hz=15900):
    """The recorder cuts the top with a steep low-pass."""
    return signal.sosfilt(signal.ellip(8, .2, 70, top_hz, fs=SR, output="sos"), dry)


dry = scene()
out = record(dry)
transcribe(out)
```